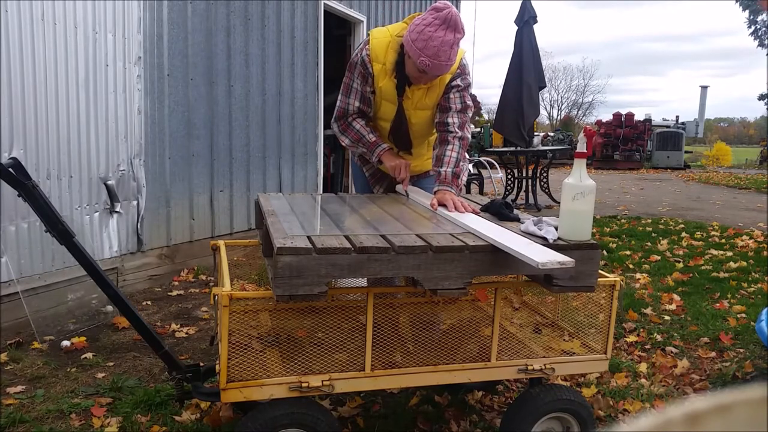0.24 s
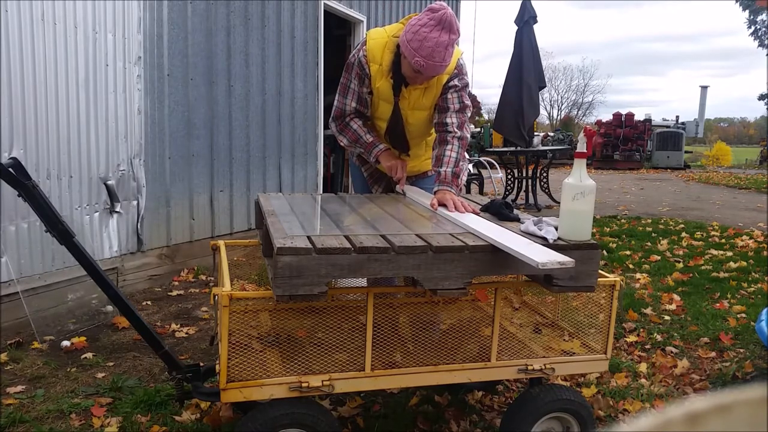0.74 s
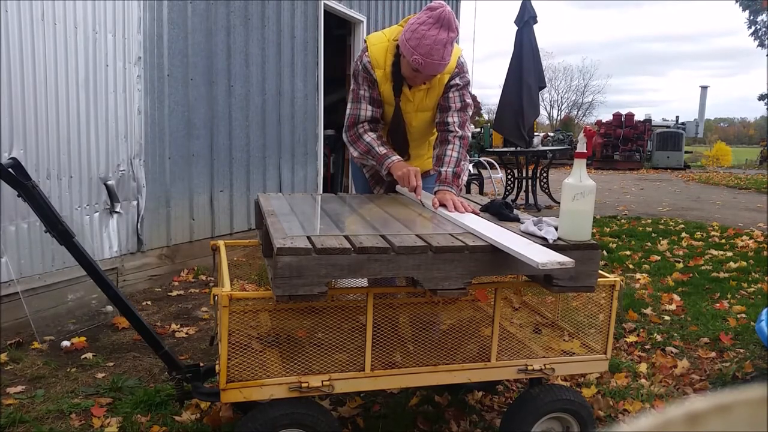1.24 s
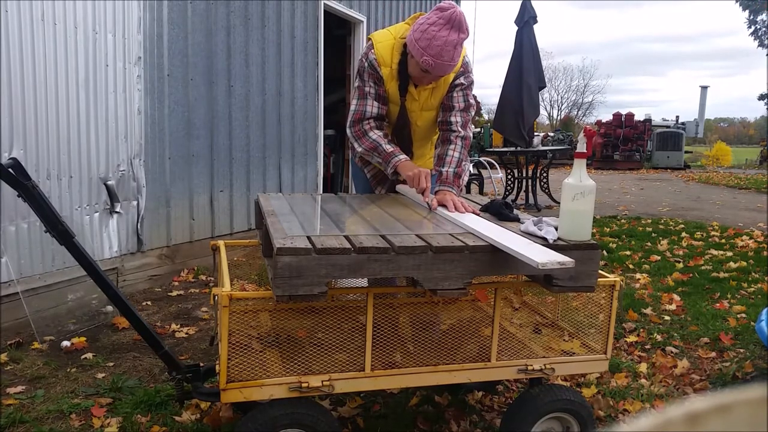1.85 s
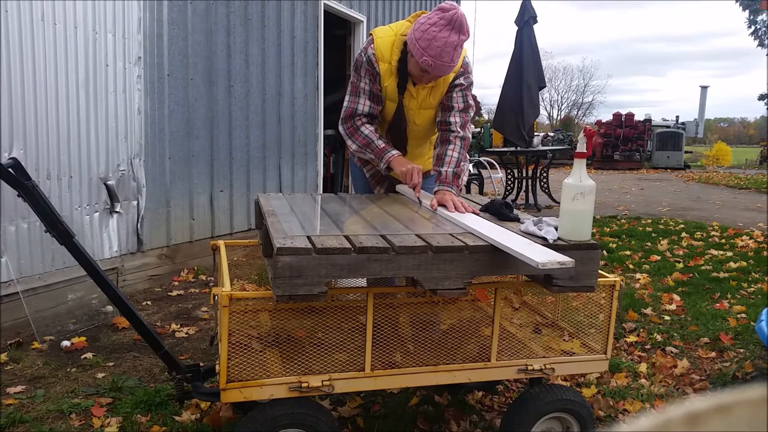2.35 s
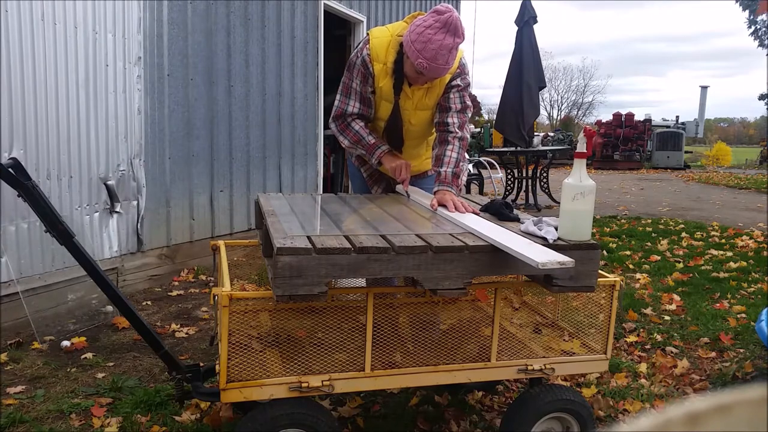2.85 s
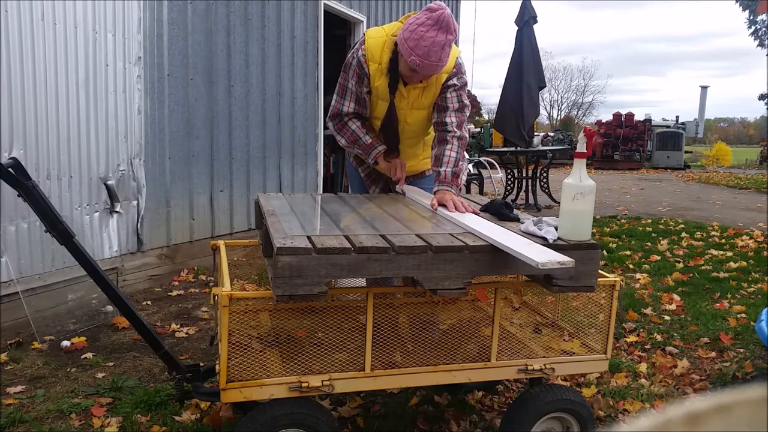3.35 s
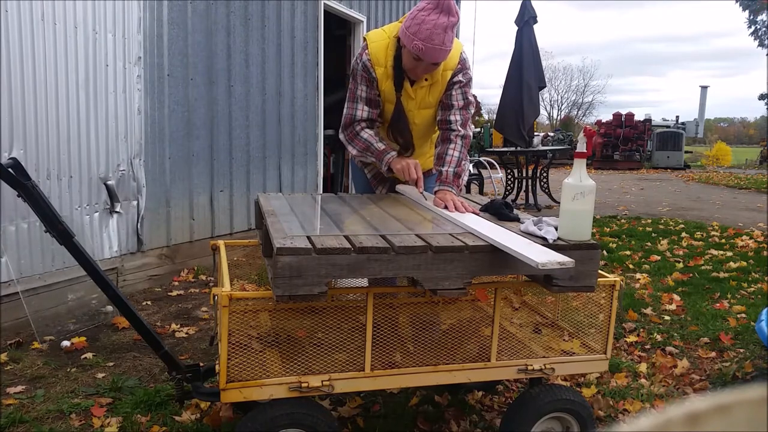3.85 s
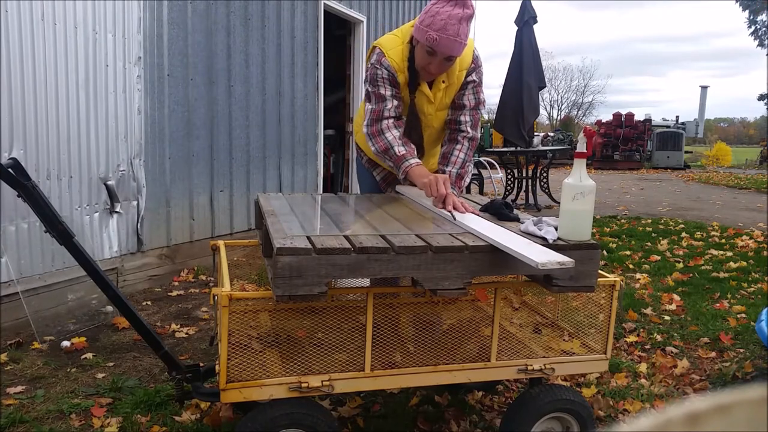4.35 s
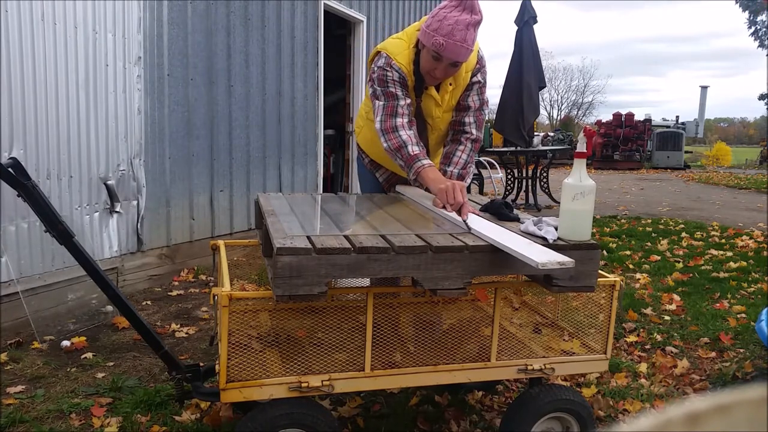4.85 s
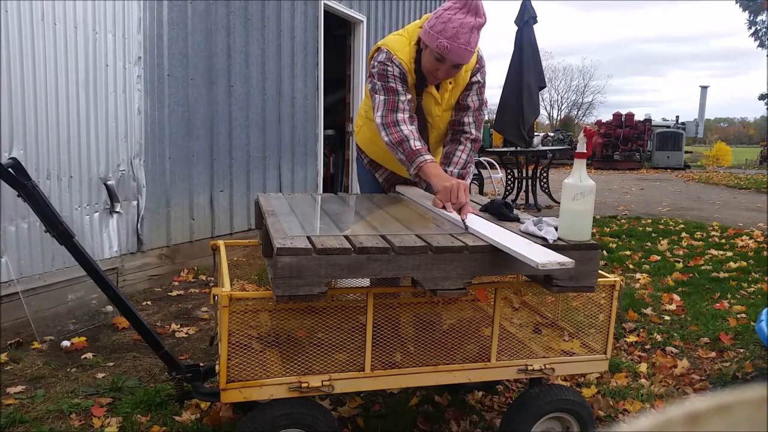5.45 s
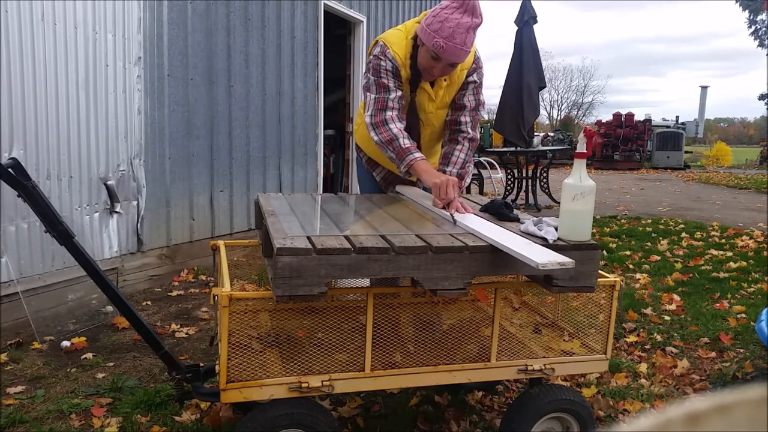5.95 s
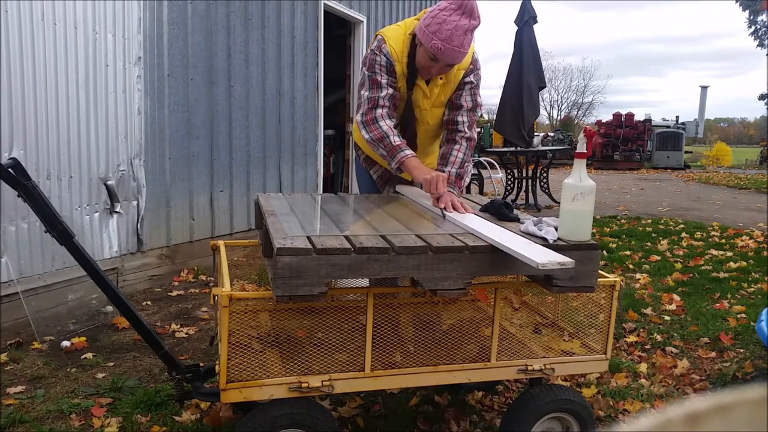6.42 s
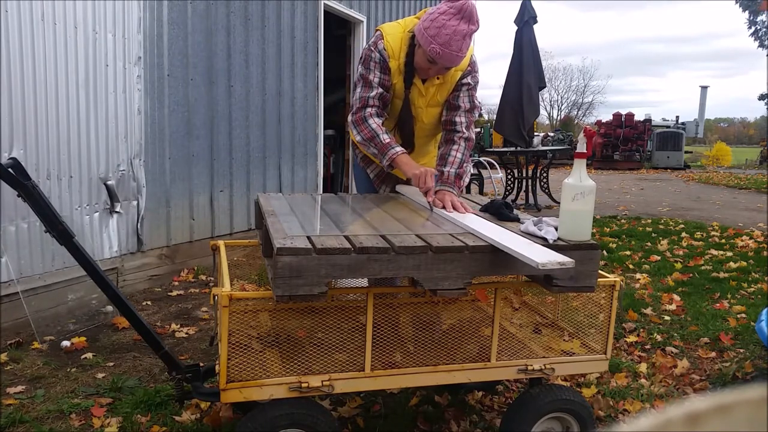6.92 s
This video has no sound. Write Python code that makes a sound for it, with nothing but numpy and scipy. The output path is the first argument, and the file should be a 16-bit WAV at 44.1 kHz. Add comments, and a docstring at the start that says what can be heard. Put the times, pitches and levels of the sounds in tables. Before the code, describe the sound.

Gritty, crackling passes of a hand glass cutter scoring a pane outdoors, short strokes then two long ones, with wind rumbling and buffeting the microphone.

```python
"""Scoring glass outdoors

A cutter wheel scores a pane lying on a pallet: short strokes, then two long gritty passes.
Crushed glass is a dense train of random impulses that hisses and excites the modes of the pane.
Larger chips click as decaying sines in noise; the tool knocks once as two decaying partials.
Wind is shaped noise, independent at the two ports of a microphone, with low buffets and short slaps.
Filtered noise behind it makes stirring leaves and a faint hush."""
import sys
import numpy as np
from scipy import signal
from scipy.fft import rfft, irfft, next_fast_len
from scipy.io import wavfile
from scipy.ndimage import uniform_filter1d

SR = 44100
rng = np.random.default_rng(int(sys.argv[2]) if len(sys.argv) > 2 else 0)


def materialize(psi):
    """Save the field psi as 16-bit PCM at rate SR to the path in sys.argv[1].

    A 1-D psi becomes a single channel; in a 2-D psi each row is a channel.
    """
    bounded = np.clip(np.atleast_2d(psi).T, -1, 1)
    quanta = np.round(bounded * 32767).astype(np.int16)
    wavfile.write(sys.argv[1], SR, quanta)


N = 316638
TIME = np.arange(N) / SR
SIZE = next_fast_len(N)  # transform length
HZ = np.maximum(np.arange(SIZE // 2 + 1) * SR / SIZE, 1.0)


def undb(db):
    """Logarithmic level: amplitude gain of a level in dB."""
    return 10 ** (np.asarray(db) / 20)


def unit(x):
    """Normalization: the signal scaled to rms 1."""
    return x / np.sqrt(np.mean(x ** 2))


def over_hz(table, col=1):
    """Spectral interpolation: a table column at every frequency, linear in log frequency."""
    table = np.array(table, float)
    return np.interp(np.log(HZ), np.log(table[:, 0]), table[:, col])


def walk(rate):
    """Slow modulation: random levels drawn at a rate [1/s], smoothed by two running means, rms 1."""
    hold = int(SR / rate)
    steps = np.repeat(rng.standard_normal(N // hold + 1), hold)
    return unit(uniform_filter1d(uniform_filter1d(steps, hold), hold)[:N])


def bands(spectrum, lo_hz, hi_hz, count):
    """Filter bank: overlapping slices that sum to the spectrum between the outer centres."""
    step = np.log(hi_hz / lo_hz) / (count - 1)
    for k in range(count):
        place = np.log(HZ / lo_hz) / step - k
        share = np.clip(1 - np.abs(place), 0, 1)
        yield lo_hz * np.exp(k * step), irfft(spectrum * share, SIZE)[..., :N]


def grains(rate, scatter_db):
    """Shot noise: cracks at random instants [1/s], most small and a few large, rms 1."""
    chance = rng.random((3, N))
    size_db = scatter_db * np.minimum(-np.log(1 - chance[2]), 4.5)
    struck = chance[0] < rate / SR
    return unit(struck * np.sign(chance[1] - 0.5) * undb(size_db))


# Relative spectrum of the hush: (frequency [Hz], relative density [dB per Hz])
HUSH_SPECTRUM = [(150, -34.5), (250, -2), (313, -7.5), (826, -17), (1370, -26.5), (3730, -42),
                 (4670, -46.5), (8130, -67), (9840, -73), (11900, -40), (15700, -36.5)]
HUSH_DB = -53  # mean level before its slow drift


def hush():
    """Stationary noise: far rustle and microphone hiss, partly shared by the ports, drifting slowly."""
    colour = over_hz(HUSH_SPECTRUM) - 18 * np.clip(np.log2(250 / HZ), 0, None)
    mid, side = rng.standard_normal((2, N))
    both = rfft([mid + 0.81 * side, mid - 0.96 * side], SIZE)
    air = irfft(both * undb(colour), SIZE)[:, :N]
    return unit(air) * undb(HUSH_DB + 0.71 * walk(1.6))


RUSTLE_DB, RUSTLE_FOLLOWS, RUSTLE_HZ = -80, 0.41, 2500  # base level; dB per dB of gust; centre


def rustle():
    """Wind-driven noise: leaves stir faintly in patches, more when the wind is up."""
    s, left_db, right_db = np.transpose(WIND_GUSTS)
    gust_db = np.interp(TIME, s, np.maximum(left_db, right_db) + 18.5)
    colour = undb(-4 * np.log2(HZ / RUSTLE_HZ) ** 2)
    leaves = irfft(rfft(rng.standard_normal((2, N)), SIZE) * colour, SIZE)[:, :N]
    return unit(leaves) * undb(RUSTLE_DB + RUSTLE_FOLLOWS * gust_db + 1.7 * walk(27))


# Relative spectrum of the turbulence: (frequency [Hz], relative density [dB per Hz])
WIND_SPECTRUM = [(8.8, -52), (15, -12.5), (65, 1.5), (103, 0), (203, -6.5), (248, -16), (414, -30.5),
                 (773, -48.5), (1200, -72.5), (1560, -94.5), (2640, -120)]
# Course of the wind at the ports: (time [s], left relative level [dB], right relative level [dB])
WIND_GUSTS = [(0.0, -29.5, -10.5), (0.15, -29, -56), (0.24, -11, -49.5), (0.4, -13, -13.5),
              (0.52, -20, -15.5), (0.621, -15.5, -16), (0.9, -25, -16.5), (1.4, -19.5, -16.5),
              (1.55, -25, -27.5), (1.8, -46, -39.5), (1.94, -24, -26.5), (2.099, -19.5, -37),
              (2.16, -39, -44), (2.36, -38, -26), (2.86, -38.5, -37.5), (2.95, -22.5, -23.5),
              (3.2, -24.5, -34), (3.32, -18.5, -17.5), (4.1, -28, -20.5), (4.282, -15.5, -38.5),
              (4.4, -25.5, -23.5), (4.6, -26, -34), (4.76, -38.5, -28), (4.9, -32, -36), (5.1, -31, -34.5),
              (5.6, -36, -33.5), (6.2, -38, -39.5), (6.7, -31, -34.5), (6.78, -18, -49), (6.86, -27, -26),
              (7.18, -31, -34)]


def wind():
    """Turbulent pressure: unrelated noise on each port, in lumps; strong gusts gain upper rumble."""
    s, left_db, right_db = np.transpose(WIND_GUSTS)
    port_db = np.array([np.interp(TIME, s, left_db), np.interp(TIME, s, right_db)])
    colour = over_hz(WIND_SPECTRUM) - 18 * np.clip(np.log2(HZ / 1200), 0, None)
    spectrum = rfft(rng.standard_normal((2, N)), SIZE) * undb(colour)
    # lulls go deeper than peaks go high
    lumps = np.minimum(np.array([walk(20), walk(20)]), 1.1)
    eddies = np.minimum(np.array([walk(60), walk(60)]), 1.6)
    out = 0
    for hz, band in bands(spectrum, 18, 1400, count=8):
        octaves = max(np.log2(hz / 120), 0)
        gust_db = 0.37 * octaves * (port_db + 15.5)
        lump_db = (3.3 + 2.4 * min(octaves, 1.4)) * lumps
        eddy_db = 3.76 * min(octaves, 2) * eddies
        out = out + band * undb(gust_db + lump_db + eddy_db)
    rms = np.sqrt(np.mean(irfft(spectrum, SIZE) ** 2))
    return out / rms * undb(port_db - 0.5)


# Single low buffets: (time of centre [s], envelope peak [dB], port [0 left, 1 right],
# frequency [Hz], approximate width at half amplitude [ms])
LOW_BUFFETS = [(0.067, -13.5, 0, 105, 15), (0.305, -3.5, 0, 106, 29), (0.461, -9.5, 1, 81, 33),
               (0.549, -15, 1, 88, 34), (0.638, -1, 0, 113, 16), (0.881, 1.5, 1, 105, 11.7),
               (0.917, -5.5, 0, 123, 13.5), (1.069, -6.5, 0, 119, 8.4), (1.209, -7, 1, 115, 22),
               (1.299, -4.5, 0, 114, 15), (1.394, -10.5, 0, 99.5, 44), (1.935, -15.5, 1, 76.6, 18),
               (2.01, -15, 0, 105, 15), (2.085, -10, 0, 130, 16), (3.124, -6, 0, 97, 7.9),
               (3.464, -10.5, 1, 83.5, 39), (3.535, -11, 0, 130, 8.5), (3.561, -11.5, 1, 112, 29),
               (3.587, -9.5, 0, 152, 6), (3.737, -9.5, 0, 126.7, 20), (3.77, -9, 1, 105.5, 25),
               (3.929, -6.5, 0, 88, 26), (4.032, -8, 0, 108.6, 15), (4.087, -12.5, 1, 82, 20),
               (4.165, -11, 0, 111, 7.8), (4.278, -8.5, 0, 108, 16), (4.322, -12, 0, 94.5, 12),
               (4.399, -8, 1, 74, 19), (4.431, -8, 0, 90, 14), (4.575, -9.5, 0, 120.5, 14),
               (4.893, -17, 0, 126, 10), (5.084, -13.5, 0, 104, 10)]


def buffets():
    """Pressure transients: a short low swing under a Gaussian envelope at one port."""
    out = np.zeros((2, N))
    for (s, db, port, hz, ms), phase in zip(LOW_BUFFETS, rng.random(len(LOW_BUFFETS))):
        near = slice(max(int(s * SR) - SR // 10, 0), int(s * SR) + SR // 10)
        t = TIME[near] - s
        envelope = undb(db) * np.exp(-2.6 * (t * 1000 / ms) ** 2)
        out[int(port > 0.5), near] += envelope * np.sin(2 * np.pi * (hz * t + phase))
    return out


# Eddies that slap the ports: (onset [s], level before the low-pass [dB], left minus right [dB])
EDDY_SLAPS = [(0.217, -32, 10), (0.24, -23, 24), (0.417, -10, -18), (0.831, -14, -24), (0.875, -12.5, -21),
              (0.928, -26, -6), (1.092, -28, -20), (1.171, -21.5, 5.5), (1.231, -21, -10.5),
              (1.376, -23, 17), (3.302, -28.5, -10), (3.33, -22.5, -19), (3.426, -24.5, -14),
              (3.449, -20, -17), (3.625, -23.5, 15), (3.807, -29, 12.5), (3.868, -25.5, -2),
              (3.913, -28, 13), (4.024, -30, 13.5), (4.071, -25.5, -2), (4.261, -24.5, 20.5)]
SLAP_MS, SNAP_MS, SNAP_DB = 1.264, 0.5, -17.5  # time scales; snap relative to push
SLAP_TOP_HZ = 1200


def slaps():
    """Impulsive pressure: a rounded push and pull, mostly at one port, with a snap at its front."""
    def pulse(t):
        return 7.2 * t ** 3 * np.exp(-1.5 * t) * np.cos(1.185 * t)

    out, ms = np.zeros((2, N)), np.arange(0, 14 * SLAP_MS, 1000 / SR)
    push = pulse(ms / SLAP_MS) + undb(SNAP_DB) * pulse(ms / SNAP_MS)
    for s, db, pan_db in EDDY_SLAPS:
        i = int(s * SR)
        out[:, i:i + len(ms)] += undb(db + np.array([[pan_db], [-pan_db]]) / 2) * push
    return signal.sosfilt(signal.butter(4, SLAP_TOP_HZ, fs=SR, output="sos"), out)


# Partials of the wooden straightedge: (frequency [Hz], relative level [dB], t60 [s])
STRAIGHTEDGE_MODES = [(620, -0.5, 0.064), (1570, 0.5, 0.032)]
KNOCK_S, KNOCK_DB = 3.412, -32.5  # the cutter bumps the straightedge; base level of its partials


def knock():
    """Modal decay: one dull tap on the wooden straightedge, heard alike at both ports."""
    t = np.maximum(TIME - KNOCK_S, 0)
    tap = 0
    for hz, db, t60 in STRAIGHTEDGE_MODES:
        tap = tap + undb(db - 60 * t / t60) * np.sin(2 * np.pi * hz * t)
    return undb(KNOCK_DB) * tap


# How the ports hear the pane: (frequency [Hz], left minus right [dB], phase lead of left [rad],
# likeness [0-1])
PORT_RESPONSE = [(500, 1.5, 0.41, 0.8), (1330, -1, 1.2, 1), (2150, 2.5, 2.6, 0), (2900, -1.5, 16, 0.1),
                 (4500, 10.5, 14, 0.1), (5600, 15, 10, 0.6), (7400, 7.5, 20, 0.04), (9340, 4.5, 19, 0.3),
                 (13300, 2.5, 28.3, 0.2), (15540, -9, 26, 0.18)]


def ports(near, other):
    """Partial coherence: ports differ in colour and phase; some sound reaches the right by other paths."""
    pan = undb(over_hz(PORT_RESPONSE) / 2)
    like = np.clip(over_hz(PORT_RESPONSE, col=3), 0, 1)
    lagged = near * np.exp(-1j * over_hz(PORT_RESPONSE, col=2))
    right = like * lagged + np.sqrt(1 - like ** 2) * other
    return np.array([near * pan, right / pan])


# Wheel on the glass, one list per stroke from touch to lift: (time [s], relative hiss level [dB],
# lift of the pane drone [dB], lift of the grit [dB])
WHEEL_STROKES = [
    [(0.0, -33.5, 2, 0.5), (0.155, -39, -2.5, 3)],
    [(0.205, -41.5, 4, 0), (0.24, -36.5, -2, 2.5), (0.39, -36, 4, 2), (0.43, -43.5, 0, 2)],
    [(0.503, -43.5, 5.5, 5.5), (0.595, -32, -2.5, 0), (0.65, -46, 1, 2.5)],
    [(0.725, -47, 5.5, 2.5), (0.78, -29.5, -6.5, 1.5), (0.835, -41, 1, -5.5)],
    [(2.06, -39, 1.5, 1.5), (2.36, -26.5, -4, -7.5), (2.45, -32, -1.5, 0), (2.62, -27.5, -7, -1),
     (2.84, -24.5, -4.5, -3), (2.95, -32, -4.5, -3), (3.1, -34, -5.5, -3), (3.21, -28, -5, -1.5),
     (3.285, -27, -8.5, -1.5)],
    [(3.378, -32, -5, 3), (3.41, -32, -4, -7.5)],
    [(3.53, -54, 7, 1), (3.535, -56.5, -5, 5)],
    [(3.59, -44.5, 5.5, 4), (3.61, -52, 5, 0.5)],
    [(5.075, -56, 5.5, -29), (5.085, -61.5, -4, -16)],
    [(5.345, -61.5, 8, -4), (5.42, -48.5, -4, -6), (5.47, -47.5, -16, -5), (5.51, -52.5, 0, -7.5),
     (5.69, -43, -0.5, -5.5), (5.72, -35, -5.5, -11), (5.85, -31.5, -4, -8), (6.06, -27.5, -7.5, -9.5),
     (6.1, -31.5, -2.5, -1.5), (6.19, -28, -4.5, -8.5), (6.31, -28.5, -8, -9), (6.34, -30.5, -4.5, -5.5),
     (6.4, -28.5, -4.5, -2.5), (7.18, -26, -3.5, -2.5)],
]
BITE_DB_PER_S, LIFT_DB_PER_S = 1501.5, 383.5  # rise of the hiss before touch; fall after lift
LINGER_DB, LINGER_S = -23.5, 0.1  # pane and yard sound on after the wheel has left


def contact():
    """Energy addition: each stroke bites, holds and lifts off, then lingers faintly."""
    power = 0
    for rows in WHEEL_STROKES:
        s, db = np.transpose(rows)[:2]
        bite_db = BITE_DB_PER_S * np.maximum(s[0] - TIME, 0)
        lift_db = LIFT_DB_PER_S * np.maximum(TIME - s[-1], 0)
        power = power + undb(np.interp(TIME, s, db) - bite_db - lift_db) ** 2
    keep = np.exp(-1 / (LINGER_S * SR))
    lingering = signal.lfilter([1 - keep], [1, -keep], power)
    return np.sqrt(power + undb(LINGER_DB) ** 2 * lingering)


# Single large chips: (onset [s], level before filtering [dB])
LARGE_CHIPS = [(0.025, -29.5), (0.103, -43), (0.125, -23), (0.204, -36), (0.312, -32), (0.3298, -28),
               (0.369, -25), (0.381, -28), (0.4142, -26.5), (0.5043, -33), (0.527, -26), (0.542, -26),
               (0.743, -33), (0.78, -25.5), (2.343, -25), (2.4612, -31), (2.52, -20.5), (2.541, -29),
               (2.642, -19), (2.6927, -18.5), (2.738, -23.5), (2.744, -18), (2.749, -22), (2.755, -17.5),
               (2.767, -23.5), (2.85, -20.5), (2.872, -22), (2.9871, -24), (3.0, -23), (3.012, -31.5),
               (3.058, -28), (3.07, -24.5), (3.105, -24), (3.146, -24.5), (3.234, -21.5), (3.283, -24),
               (3.378, -24.5), (5.945, -34), (6.147, -28), (6.543, -28)]
CHIP_HZ, CHIP_SPREAD = 5030, 0.012  # mean ring frequency; relative scatter
SPLINTERS_PER_S, SPLINTER_DB = 300, -14.5  # small chips; base level relative to the contact
CLUSTER_DB = 3.5  # rms depth of their bunching


def chips():
    """Brittle fracture: each crack rings a moment, amid a swarm of splinters; the left port faces it."""
    out, t = np.zeros(N + 2000), np.arange(1500) / SR
    pitches = CHIP_HZ * (1 + CHIP_SPREAD * rng.standard_normal(len(LARGE_CHIPS)))
    for (s, db), hz in zip(LARGE_CHIPS, pitches):
        ring = np.sin(2 * np.pi * hz * t) * np.exp(-t / 0.0014)
        spray = 0.23 * rng.standard_normal(len(t)) * np.exp(-t / 0.0066)
        snap = 0.35 * rng.standard_normal(len(t)) * np.exp(-t / 0.00032)  # at its front
        i = int(s * SR)
        out[i:i + len(t)] += undb(db) * (ring + spray + snap)

    hits = np.abs(grains(SPLINTERS_PER_S, scatter_db=3.0))
    bursts = signal.oaconvolve(hits, np.exp(-t / 0.0032))[:N]
    splinter_band = signal.butter(2, [2500, 6000], "band", fs=SR, output="sos")
    swarm = signal.sosfilt(splinter_band, bursts * rng.standard_normal(N))
    s, _, _, grit_db = np.vstack(WHEEL_STROKES).T
    swarm_db = SPLINTER_DB + np.interp(TIME, s, grit_db) + CLUSTER_DB * walk(25)
    out = out[:N] + undb(swarm_db) * unit(swarm) * contact()

    out = signal.sosfilt(signal.butter(2, [900, 9000], "band", fs=SR, output="sos"), out)
    other_path = np.roll(out, 40)  # later by 40 samples
    return irfft(ports(rfft(out, SIZE), rfft(other_path, SIZE)), SIZE)[:, :N]


def ringing(width_hz, depth_db):
    """Modal overlap: close modes give a ragged minimum-phase response that rings after each crack."""
    k = int(width_hz * SIZE / SR)
    ragged = uniform_filter1d(uniform_filter1d(rng.standard_normal(len(HZ)), k), k)
    cepstrum = irfft(np.log(undb(depth_db * unit(ragged))), SIZE)
    cepstrum[1:SIZE // 2] *= 2  # folded over, so the ring follows the crack
    cepstrum[SIZE // 2 + 1:] = 0
    response = np.exp(rfft(cepstrum))
    return response / np.sqrt(np.mean(np.abs(response) ** 2))


# Pane resonances before scatter: (frequency [Hz], width at half the dB gain [Hz], peak gain [dB])
PANE_MODES = [(1580, 150, 7), (2328, 100, 5.5), (3140, 290, 3), (5070, 570, -3.5), (12200, 100, 3),
              (13500, 520, 4), (14400, 350, 6)]


def crush(shifts, place):
    """Forced vibration: grains shake the pane; each spot passed has its own shifted resonances."""
    cracks = grains(5000, scatter_db=3.0) + 0.67 * rng.standard_normal(N)
    modes = ringing(75, depth_db=4.5)
    spots, out = len(shifts), 0
    for k, shift in enumerate(shifts):
        away = (place - k + spots / 2) % spots - spots / 2  # spots cycle in a ring
        fade = np.cos(np.clip(away, -1, 1) * np.pi / 2)
        pane_db = 0
        for (hz, width, db), move in zip(PANE_MODES, shift):
            pane_db = pane_db + db / (1 + (2 * (HZ - hz * move) / width) ** 2)
        spot_modes = np.roll(modes, k * len(modes) // spots)
        out = out + rfft(cracks * fade, SIZE) * spot_modes * undb(pane_db)
    return out


# Swells of the pane's drone as the wheel digs in or brushes it; the first is a faint rustle:
# (middle of rise [s], level before the fade [dB], rise [ms])
DRONE_SURGES = [(.955, -59, 10), (1.721, -62, 6.2), (2.3326, -38, 9.6), (2.51, -41, 26), (2.54, -38, 12),
                (2.641, -27, 17), (2.687, -29, 15), (2.7472, -31.5, 13), (2.801, -28.5, 13), (2.85, -43, 8),
                (2.895, -38, 7.9), (3.0385, -37.5, 22), (3.5285, -46.5, 5), (3.5912, -51.5, 6.9),
                (5.062, -65, 15), (5.44, -41.5, 4.4), (6.0474, -26, 51), (6.291, -33, 16),
                (6.3699, -34.5, 10), (6.419, -36.5, 6), (6.498, -31.5, 6.6), (6.538, -31, 5.4),
                (6.6, -41, 13), (6.681, -28, 47), (6.76, -32.5, 15), (6.83, -32, 16), (6.8955, -30, 8.5),
                (7.003, -26.5, 32), (7.122, -30, 19)]
SURGE_FADE_S = 0.015  # time constant


def surges(spectrum):
    """Amplitude envelope: band-limited pane noise swells in linear rises and fades exponentially."""
    low_pass, high_pass = 1 / (1 + (HZ / 6000) ** 4), 1 / (1 + (900 / HZ) ** 6)
    drone = irfft(spectrum * low_pass * high_pass, SIZE)[:, :N]
    swell = 0
    for s, db, ms in DRONE_SURGES:
        rise = np.clip((TIME - s) * 1000 / max(ms, 1) + 0.5, 0, 1)
        fade = np.exp(-np.maximum(TIME - s, 0) / SURGE_FADE_S)
        swell = swell + undb(db) * rise * fade
    return unit(drone) * swell


# Relative colour of the scoring: (frequency [Hz], relative density [dB per Hz])
SCORE_SPECTRUM = [(290, -43.5), (500, -15.5), (727, -6.5), (853, -17), (1190, -5.5), (1830, -9),
                  (3210, -8.5), (3500, -12), (5100, -11), (7310, -23.5), (8570, -21), (13400, -1),
                  (15700, -6)]
PANE_SHIFT, TRAVEL_PER_S = 0.08, 9.0  # relative scatter of resonances; mean spots passed per second


def scoring():
    """Source and resonator: crushed grains ring the pane; each band flickers as the wheel judders."""
    colour = over_hz(SCORE_SPECTRUM) - 24 * np.clip(np.log2(500 / HZ), 0, None)
    shifts = 1 + PANE_SHIFT * rng.standard_normal((6, len(PANE_MODES)))
    place = TRAVEL_PER_S * TIME + 0.6 * walk(4)
    spectrum = ports(crush(shifts, place), crush(shifts, place)) * undb(colour)
    s, _, drone_db, grit_db = np.vstack(WHEEL_STROKES).T
    drone_db, grit_db = np.interp(TIME, s, drone_db), np.interp(TIME, s, grit_db)
    out, judder, crackle = 0, walk(20), walk(110)
    for hz, band in bands(spectrum, 400, 18460, count=12):
        # shares of this band: drone low, grit in the middle, neither at the top
        zone = np.interp(np.log(hz), np.log([2403, 4850, 6550, 11300]), np.arange(4))
        drone, grit = np.clip(1 - zone, 0, 1), np.clip(min(zone, 3 - zone), 0, 1)
        stroke_db = drone * drone_db + grit * grit_db
        crackle_db = (0.97 + 0.65 * grit) * crackle  # the grit comes in quick bursts
        out = out + band * undb(stroke_db + 0.25 * judder + 2.67 * walk(30) + crackle_db)
    # the top of the spectrum sets the reference level of the hiss
    hiss = irfft(spectrum.mean(axis=0) * (HZ > 10500), SIZE)
    return out / np.sqrt(np.mean(hiss ** 2)) * contact() + surges(spectrum)


def scene():
    """Superposition: the sources add, from the background to the cutter."""
    return hush() + rustle() + wind() + buffets() + slaps() + knock() + chips() + scoring()


TOP_HZ, CEILING = 15750, 0.95  # cutoff; saturation limit before the cut


def record(dry):
    """Saturation and band limiting: tanh rounds the loudest buffets, a steep filter cuts the top."""
    steep = signal.ellip(16, 0.3, 60, TOP_HZ, fs=SR, output="sos")
    return signal.sosfilt(steep, CEILING * np.tanh(1.137 * dry))


dry = scene()
out = record(dry)
materialize(out)
```